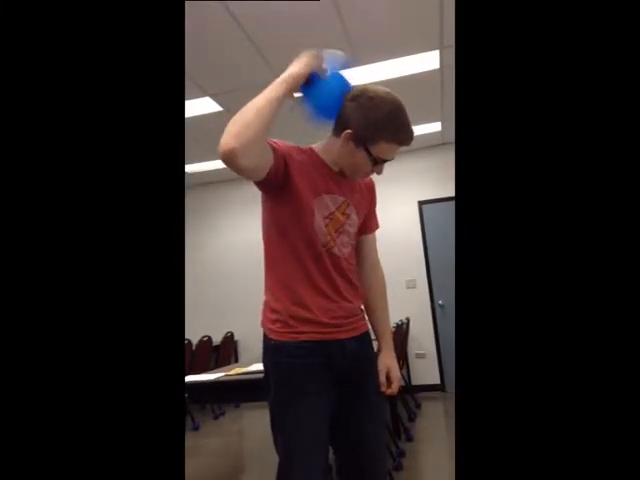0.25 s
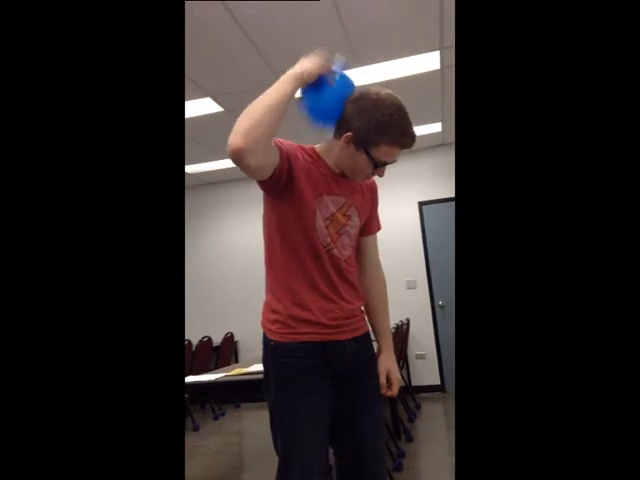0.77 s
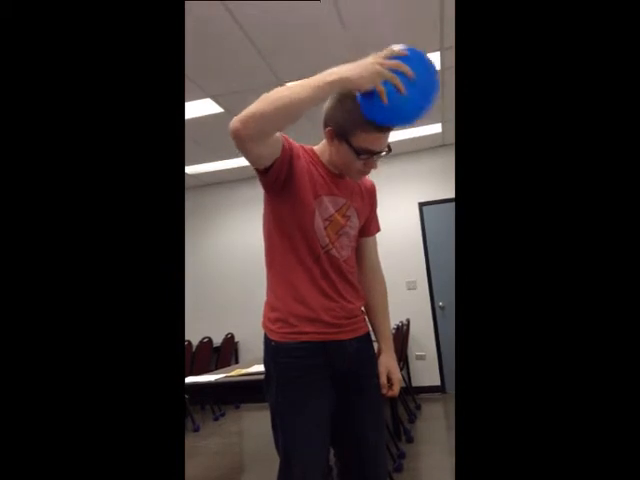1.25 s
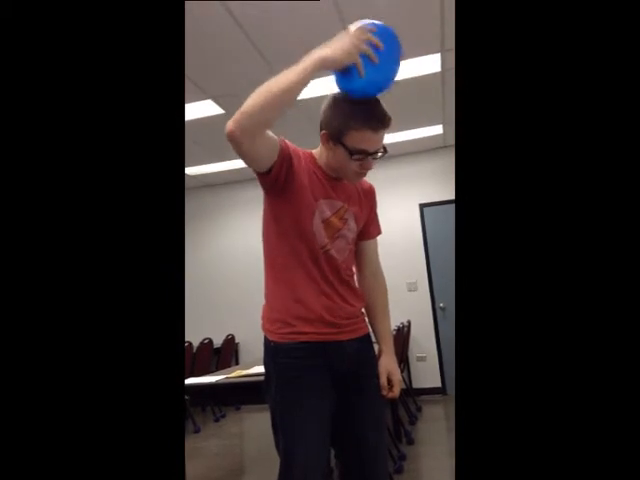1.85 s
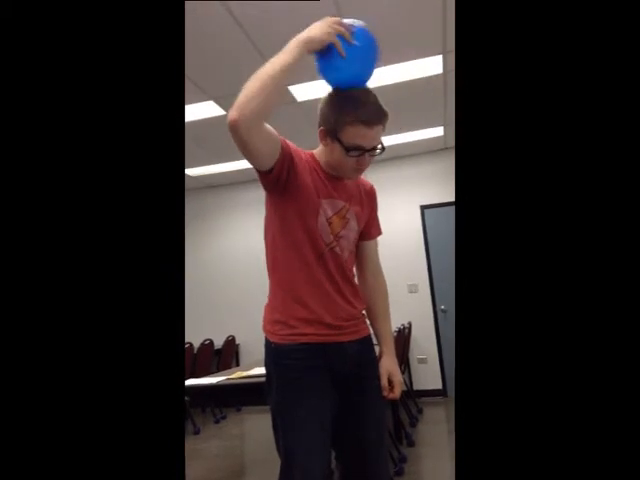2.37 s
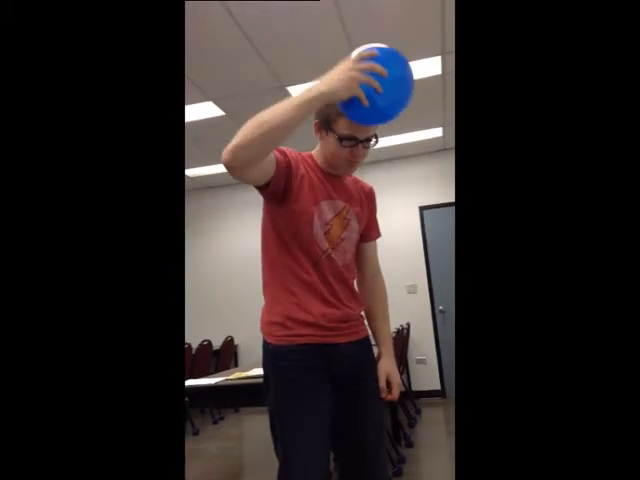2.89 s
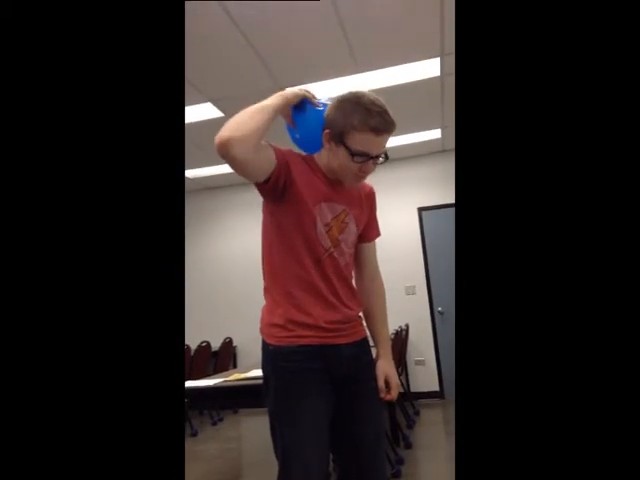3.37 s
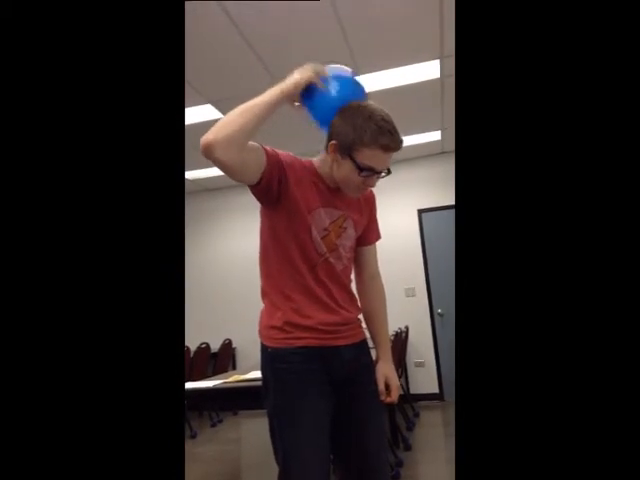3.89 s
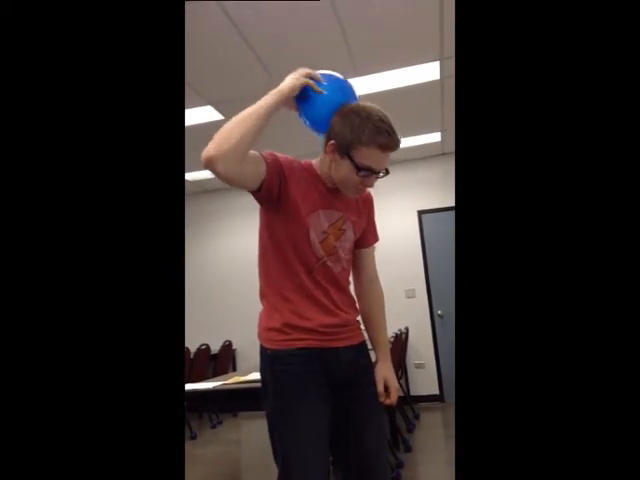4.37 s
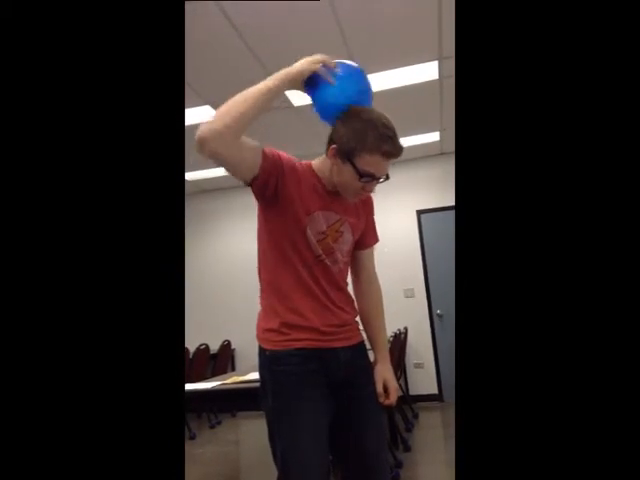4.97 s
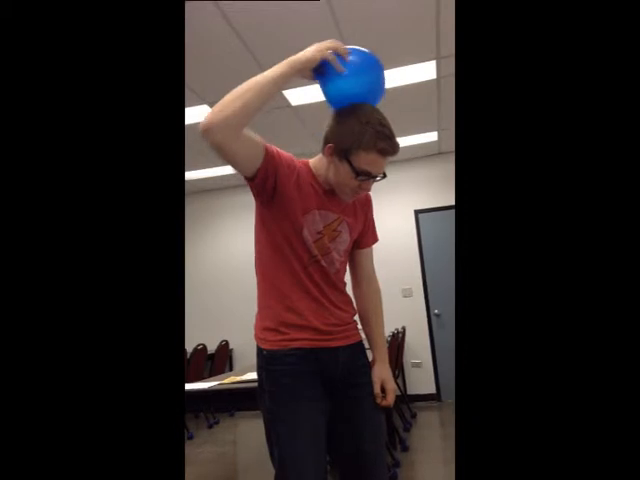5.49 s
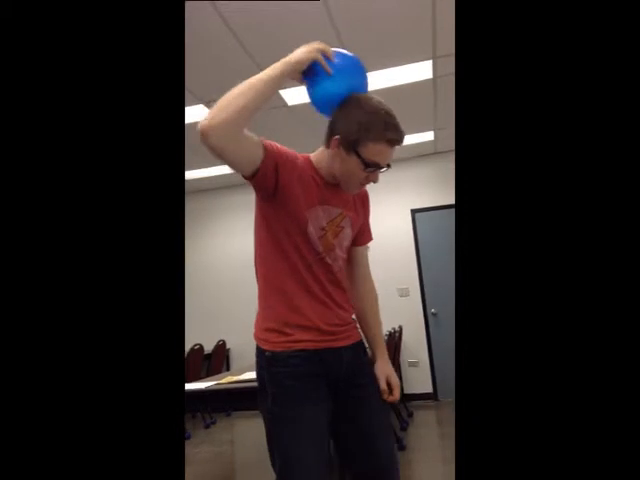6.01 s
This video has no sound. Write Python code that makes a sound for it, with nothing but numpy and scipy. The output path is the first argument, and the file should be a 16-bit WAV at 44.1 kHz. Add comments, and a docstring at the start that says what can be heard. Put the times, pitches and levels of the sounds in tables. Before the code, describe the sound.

Close by, an inflated balloon rubs rapidly on hair, each stroke a bright rough hiss with a hollow squeaky ring. After less than a second it catches with several soft rubbery thumps, then slows to quieter sweeps. A second fast bout follows midway, then longer gentle strokes. Quiet meeting room, microphone a step or two away, faint ventilation.

```python
"""A fine, rough hiss with hollow squeaks and booms: an inflated rubber balloon is rubbed on a head of hair in a
quiet meeting room. Two bouts of quick scrubbing are each followed by slower sweeps, with a few soft thumps.
Hairs slip over the skin (coloured trains of random clicks), the drag rings the balloon (resonant filters),
friction locks on to a resonance (short sines), and rubber grabs and lets go (noise and falling sines).
One microphone, a step or two away, also hears the room's answer and a faint rush of ventilation."""
import sys
import numpy as np
from scipy import signal
from scipy.fft import rfft, irfft, next_fast_len
from scipy.io import wavfile
from scipy.ndimage import uniform_filter1d, map_coordinates

SR = 44100
rng = np.random.default_rng(int(sys.argv[2]) if len(sys.argv) > 2 else 0)


def master(y):
    """Save y as 16-bit WAV."""
    cut = np.clip(np.atleast_2d(y).T, -1, 1)
    pcm = np.round(cut * 32767)  # scale
    wavfile.write(sys.argv[1], SR, pcm.astype(np.int16))


N = 275184

# Quick back-and-forth strokes: [nominal full speed t/s, relative hiss level/dB, relative drag level/dB]
QUICK_STROKES = [(-.025, -36, -38), (.069, -33, -47.5), (.149, -33, -41), (.254, -34, -40.5),
                 (0.339, -37, -40), (0.434, -33.5, -44.5), (.519, -33.5, -41), (.624, -33, -41.5),
                 (.711, -33.5, -39), (.818, -35.5, -46), (3.492, -34.5, -43.5), (3.586, -35, -41.5),
                 (3.686, -32.5, -40), (3.787, -32.5, -37.5), (3.882, -35.5, -40.5), (3.96, -35.5, -42),
                 (4.057, -33, -42.5), (4.152, -37, -46.5)]
# Colour of whole tufts rasping on rubber: [f/Hz, relative level/dB]
RASP_COLOUR = [(120, -28), (400, -10), (800, -1.5), (1300, 3), (1550, 2.5), (1900, 3.5), (2300, -2),
               (3100, -0.5), (4200, -3), (7000, -7.5), (15000, -19)]


def amp(db):
    """Decibels to gain."""
    return 10 ** (np.asarray(db) / 20)


def unit(x):
    """Scale to rms 1."""
    return x / np.sqrt(np.mean(x ** 2) + 1e-20)


def along(points, hz):
    """Read (Hz, value) points on a log frequency axis."""
    point_hz, values = np.transpose(points)
    return np.interp(np.log(hz + 1), np.log(point_hz), values)


def wobble(rate):
    """A smooth random curve with rate knots a second."""
    knots = rng.standard_normal(int(N * rate / SR) + 4)
    return map_coordinates(knots, [np.arange(N) * rate / SR])


def swell(centre, length, lean=0):
    """A bell-shaped rise and fall in time; lean shortens the rise and stretches the fall."""
    age = np.arange(N) / SR - centre
    side_length = length * (1 + lean * np.sign(age))
    return np.exp(-.5 * (age / side_length) ** 2)


def filtered(x, response):
    """Filter x by a complex response of frequency."""
    m = next_fast_len(N + SR // 2)
    hz = np.fft.rfftfreq(m, 1 / SR)
    return irfft(rfft(x, m) * response(hz), m)[:N]


def coloured(x, spectrum):
    """Give x the tone colour of a spectrum, at rms 1."""
    return unit(filtered(x, lambda hz: amp(along(spectrum, hz))))


def ventilation(level_db=-66):
    """Steady turbulent air: noise coloured as a faint rush."""
    # Colour of the moving air: [f/Hz, relative level/dB]
    air_colour = [(25, -40), (50, -34), (78, -20), (98, -1), (116, 5), (145, -2), (220, -0.5), (400, -38),
                  (1000, -19), (4000, -37), (15000, -53)]
    return amp(level_db) * coloured(rng.standard_normal(N), air_colour)


def scrubbing(rasp_db=-4, drag_db=-1.0, boom_db=-46, drag_lag=0.002, grip_share=0.82, turn_hiss_db=-14,
              turn_drag_db=-7, turn_boom_db=-3, turn_lag=0.03, turn_length=0.04, lean=0.35, lead=0.0068):
    """Strength of hiss, rasp, drag and boom in quick strokes: each peaks in mid-swing, lingers as the hand turns."""
    stroke_length = .013  # s, half-length of a quick stroke
    power = 0
    for s, hiss_db, stroke_drag_db in QUICK_STROKES:
        swing = swell(s - lead, stroke_length, lean)
        # the rubber bites only at the height of the swing
        press = swell(s + drag_lag, stroke_length * grip_share, lean)
        turn = swell(s + turn_lag, turn_length)
        speed = swing + amp(turn_hiss_db) ** 2 * turn
        pressure = press + amp(turn_drag_db) ** 2 * turn

        hiss = amp(hiss_db) ** 2 * speed
        # rasp needs both speed and pressure
        rasp = amp((hiss_db + stroke_drag_db) / 2 + rasp_db) ** 2 * np.sqrt(speed * pressure)
        drag = amp(stroke_drag_db + drag_db) ** 2 * pressure
        boom = amp(boom_db) ** 2 * (press + amp(turn_boom_db) ** 2 * turn)
        power = power + np.array([hiss, rasp, drag, boom])
    return np.sqrt(power)


def sliding(age, length):
    """Attack, hold and release of one sweep, from 0 to 1."""
    attack_s, release_s = 0.021, 0.022  # the hand gets going, and comes to rest
    attack = (1 + np.tanh(age / (2 * attack_s))) / 2
    release = (1 + np.tanh((length - age) / (2 * release_s))) / 2
    return attack * release


def sweeps(rasp_db=5.0, boom_db=2.5):
    """The same four strengths in slow sweeps: each gets going, speeds up or slows down steadily, and stops."""
    # Slow sweeps: [start t/s, length/s, relative hiss level/dB, relative drag level/dB, hiss gain start to end/dB]
    slow_sweeps = [(0.825, 0.26, -45.5, -47, 5.5), (1.07, 0.17, -42.0, -52.5, -5.5),
                   (1.24, 0.064, -48, -61, 9), (1.381, 0.13, -38, -51.5, -12.5),
                   (1.472, 0.14, -42.5, -55.5, 2), (1.754, 0.18, -40.5, -53, -12),
                   (1.873, 0.16, -42.5, -52.5, 2), (2.187, 0.15, -38.0, -51.5, -16),
                   (2.327, 0.1, -41, -52.5, -0.5), (2.524, 0.19, -40.0, -52.5, -5.5),
                   (2.669, 0.19, -46.5, -59, 1), (3.004, 0.16, -37, -53, -10.5), (3.145, 0.08, -37, -49, 8),
                   (3.294, 0.082, -45.5, -51.0, -11.5), (4.205, 0.086, -55, -65, -9),
                   (4.305, 0.26, -42.0, -55.5, 5), (4.546, 0.36, -45.0, -55.5, -3.5),
                   (4.864, 0.287, -39, -53.5, 2), (5.175, 0.3, -43.5, -53, 1),
                   (5.361, 0.26, -39.5, -58, 7.5), (5.551, 0.35, -45.0, -53.0, -7),
                   (5.922, 0.21, -38, -53.0, 0), (6.117, 0.11, -38, -48, -6.5)]
    rest_hiss_db, rest_drag_db = -62, -68.5  # the balloon never lies quite still on the hair
    drag_follows = 0.51  # share of a sweep's gain or loss that the drag takes part in
    drag_lag = .006  # s, the rubber bites just after it starts to slide
    t = np.arange(N) / SR
    hiss, drag = amp(rest_hiss_db), amp(rest_drag_db)
    for start, length, hiss_db, drag_db, gain_db in slow_sweeps:
        speed_db = gain_db * (np.clip((t - start) / length, 0, 1) - .5)
        sweep_hiss = sliding(t - start, length) * amp(hiss_db + speed_db)
        sweep_drag = sliding(t - start - drag_lag, length) * amp(drag_db + drag_follows * speed_db)
        hiss, drag = np.hypot(hiss, sweep_hiss), np.hypot(drag, sweep_drag)
    # tufts rasp and the balloon wobbles as hard as it is dragged
    return np.array([hiss, amp(rasp_db) * drag, drag, amp(boom_db) * drag])


def ride_height():
    """Where the balloon rides: 0 is pressed to the side of the head, 1 is free on the crown."""
    # Path over the head: [t/s, height 0..1]
    height_path = [(1.0, 0.42), (1.4, 0.73), (2.7, 1), (3.45, 0.29)]
    return np.interp(np.arange(N) / SR, *np.transpose(height_path))


def slips(per_second, spread_db):
    """A dense train of tiny releases at random moments and of uneven size."""
    happens = rng.random(N) < per_second / SR
    sizes = rng.standard_normal(N) * amp(spread_db * rng.standard_normal(N))
    return unit(happens * sizes)


def patchy(x, depth_db):
    """The contact patch travels over the skin, so the colour of the friction keeps changing."""
    z = signal.stft(x, nperseg=512)[2]
    # random gains, smoothed over frequency and then over time
    field = uniform_filter1d(rng.standard_normal(z.shape), size=6, axis=0)
    field = uniform_filter1d(field, size=8, axis=1)
    return unit(signal.istft(z * amp(depth_db * unit(field)), nperseg=512)[1][:N])


def jerks(per_second, settle):
    """Tufts snap free at random: each lifts the friction at once, then it settles."""
    snaps = (rng.random(N) < per_second / SR) * rng.uniform(0.54, 1, N)
    lift = signal.lfilter([1], [1, -np.exp(-1 / (settle * SR))], snaps)
    return unit(lift - lift.mean())


def hair(hiss, rasp, hiss_db=0.13, rasp_db=-1.17, tuft_db=0.48):
    """Single hairs flick over the rubber; whole tufts rasp lower and make the friction uneven."""
    # Colour of single hairs on rubber: [f/Hz, relative level/dB]
    hiss_colour = [(800, -34), (2500, -9), (4000, -8.5), (5200, -7.5), (6300, -4), (7400, -3.5),
                   (8700, -4.5), (9700, -2), (10600, -0.5), (11500, -2.9), (12600, -5.5), (14200, -4.5),
                   (15300, -11.5)]
    fine = patchy(coloured(slips(per_second=26000, spread_db=0.5), hiss_colour), depth_db=1.4)
    coarse = patchy(coloured(slips(per_second=5000, spread_db=1.5), RASP_COLOUR), depth_db=2.3)
    friction = amp(hiss_db) * hiss * fine + amp(rasp_db) * rasp * coarse
    return friction * amp(tuft_db * jerks(per_second=45, settle=0.0085))


def balloon(x, modes, tuning):
    """Ring x through the balloon's resonances, all shifted by the factor tuning."""
    def response(f):
        total = 0
        for k, (centre, width, db) in enumerate(modes):
            resonance = 1j * f * width / ((centre * tuning) ** 2 - f * f + 1j * f * width)
            total = total + (-1) ** k * amp(db) * resonance  # neighbours in opposite phase
        return total
    # so small a body radiates little bass
    radiation = signal.butter(4, 150, "highpass", fs=SR, output="sos")
    return unit(signal.sosfilt(radiation, filtered(x, response)))


def hollow(drag, modes, tightness, squeeze, level_db, judder_db):
    """Drag rings the balloon; the changing grip fades between lower and higher tunings of its resonances."""
    grip = np.pi / 4 * (1 + np.tanh(wobble(9) + tightness))  # 0 = slack, pi/2 = tight
    slack = balloon(slips(per_second=2500, spread_db=3.0), modes, 1 - squeeze)
    tight = balloon(slips(per_second=2500, spread_db=1.0), modes, 1 + squeeze)
    ringing = np.cos(grip) * slack + np.sin(grip) * tight
    return drag * amp(level_db + judder_db * wobble(60)) * ringing


def air_ring(drag, crown):
    """Skin and enclosed air ring under the drag."""
    # Skin and air resonances before squeezing: [f/Hz, width/Hz, relative level/dB]
    air_modes = [(417, 55, -8.5), (532, 38, 1.5), (582, 36, 1.5), (692, 51, 0.5), (990, 54, -13),
                 (1112, 46, -6), (1300, 88, -7), (1796, 27, -14.5)]
    # on the crown the grip leans towards tight, so the air inside rings a little higher
    return hollow(drag, air_modes, 0.87 * crown, squeeze=0.04, level_db=-0.5, judder_db=1.93)


def body_boom(boom, crown):
    """The whole balloon wobbles, less so on the crown."""
    # Whole-body resonances before squeezing: [f/Hz, width/Hz, relative level/dB]
    wobble_modes = [(189, 39, -4.5), (240.5, 36.7, -1), (295.5, 38, -3.5), (352, 41, -4.5)]
    crown_boom_db = -3
    return hollow(boom * amp(crown_boom_db * crown), wobble_modes, 0, squeeze=0.037, level_db=-2.0, judder_db=0.5)


def hums(level_db=-3.0, waver=0.0241, rough_db=4.0, detune=.03, scatter_db=0.5):
    """Sticking and slipping briefly keep step with a resonance: a short, hollow note."""
    # Single notes that stand out during strokes and sweeps: [t/s, nominal f/Hz, relative level/dB, half-length/s]
    single_notes = [(.146, 548, -36, 0.0041), (.345, 1334, -39.5, .006), (.526, 226, -40, 0.012),
                    (3.322, 512, -47.5, 0.014), (3.505, 693, -43, 0.02), (3.792, 542, -30, 0.0024),
                    (4.064, 235.7, -48, 0.01), (4.394, 233.6, -43, 0.0097), (4.534, 610, -44.5, 0.0087),
                    (5.107, 682, -47.5, 0.023), (5.669, 236, -48, .027), (5.973, 241, -43, 0.028)]
    # Notes that friction locks on to in every quick stroke:
    # [nominal f/Hz, level over the drag/dB, lag/s, half-length/s]
    lock_notes = [(233.7, -10.5, 0.0031, 0.01), (532, -1, 0.0043, 0.01), (695, -12, 0.024, 0.013)]
    notes_to_play = []
    for s, _, drag_db in QUICK_STROKES:
        for hz, db, lag, length in lock_notes:
            note_hz = hz * np.exp(detune * rng.standard_normal())
            note_db = drag_db + db + scatter_db * rng.standard_normal()
            notes_to_play.append((s + lag, note_hz, note_db, length))
    notes_to_play += list(single_notes)

    t, notes = np.arange(N) / SR, np.zeros(N)
    drift = np.cumsum(1 + waver * wobble(70)) / SR  # wavering clock shared by all notes
    for s, hz, db, length in notes_to_play:
        near = abs(t - s) < 10 * length
        bell = np.exp(-.5 * ((t[near] - s) / length) ** 2)
        tone = np.sqrt(2) * np.sin(2 * np.pi * (hz * drift[near] + rng.random()))
        notes[near] += amp(db) * bell * tone
    return notes * amp(level_db + rough_db * wobble(150))


def grabs(hold=0.0078, t60=0.031, rise=0.00027, shudder_db=-3, flop_db=-1, snap_db=-0.5, snap_t60=0.0067,
          taut_hz=900, slack_hz=300, relax=0.0039):
    """Stuck rubber lets go with a snap and shudders; the stretched skin flops back, falling in pitch."""
    # The rubber lets go: [t/s, relative level/dB]
    releases = [(0.888, -30), (.9125, -32), (0.9374, -30.5), (0.963, -36.5), (1.037, -30.5), (1.056, -38),
                (1.293, -52.5)]
    # Colour of the shudder: [f/Hz, relative level/dB]
    thump_colour = [(60, -60), (130, -30), (180, -16), (270, 6.5), (400, 4), (520, -16), (680, 10.5),
                    (850, -11), (1250, 0.5), (1900, -25), (2900, -9), (5000, -16), (14000, -21)]
    t, thumps = np.arange(SR // 10) / SR, np.zeros(N)
    shape = (1 - np.exp(-t / rise)) * amp(-60 * np.maximum(t - hold, 0) / t60)
    cycles = np.cumsum(slack_hz + (taut_hz - slack_hz) * np.exp(-t / relax)) / SR
    shudder = coloured(rng.standard_normal(N), thump_colour)
    crackle = coloured(rng.standard_normal(N), RASP_COLOUR)
    for s, db in releases:
        first = round(s * SR)
        span = slice(first, first + len(t))
        burst = shape * shudder[span]
        # every shudder carries the same energy before its own level
        burst *= amp(shudder_db) * np.linalg.norm(shape) / np.linalg.norm(burst)
        detune = np.exp(0.11 * rng.standard_normal())
        flop = amp(flop_db) * shape * np.sin(2 * np.pi * cycles * detune)
        snap = amp(snap_db - 60 * t / snap_t60) * crackle[span]
        thumps[span] += amp(db) * (burst + flop + snap)
    return signal.sosfilt(signal.butter(3, 130, "highpass", fs=SR, output="sos"), thumps)


def room(x, delay=.006, count=16):
    """The walls' answer, each band dying at its own rate; its pattern changes as the balloon moves."""
    # Decay of the room: [f/Hz, t60/s]
    room_decay = [(150, 0.85), (600, 0.22), (3000, 0.8), (14000, 0.23)]
    wet, place = np.zeros(N), np.linspace(0, count - 1, N)
    for k in range(count):
        hz, t, z = signal.stft(rng.standard_normal(SR // 2), SR, nperseg=256)
        decay = amp(-60 * t / along(room_decay, hz)[:, None])
        tail = signal.istft(z * decay, SR, nperseg=256)[1]
        tail = np.pad(tail / np.linalg.norm(tail), (int(delay * SR), 0))
        # equal-power fade from one place's tail to the next
        share = np.sqrt(np.clip(1 - abs(place - k), 0, 1))
        wet += signal.oaconvolve(x * share, tail)[:N]
    return wet


def scene(room_db=-10):
    """Rubbing and thumps in the room, over a faint rush of ventilation; both channels alike."""
    hiss, rasp, drag, boom = np.hypot(sweeps(), scrubbing())
    crown = ride_height()
    crown_rasp_db = -0.4  # on the crown the hair rasps less
    friction = hair(hiss, rasp * amp(crown_rasp_db * crown))
    ring = air_ring(drag, crown) + body_boom(boom, crown)
    rubbing = friction + ring + hums() + grabs()
    mono = rubbing + amp(room_db) * room(rubbing) + ventilation()
    return np.array([mono, mono])


def record(dry):
    """The recorder keeps nothing above its band limit."""
    top_hz = 15550
    return np.array([filtered(channel, lambda hz: hz < top_hz) for channel in dry])


dry = scene()
out = record(dry)
master(out)
```